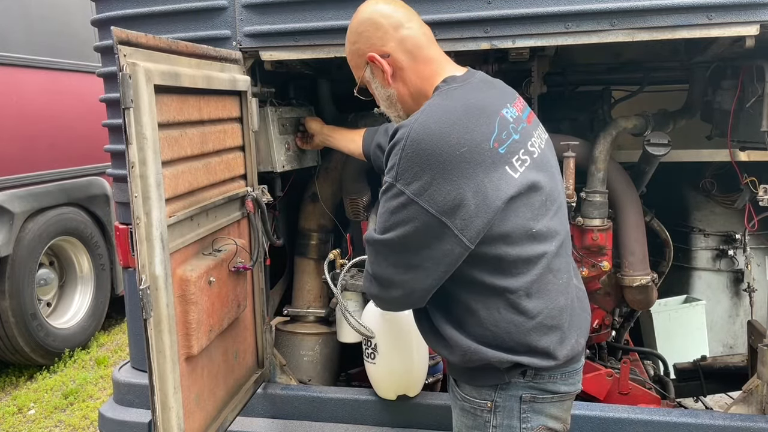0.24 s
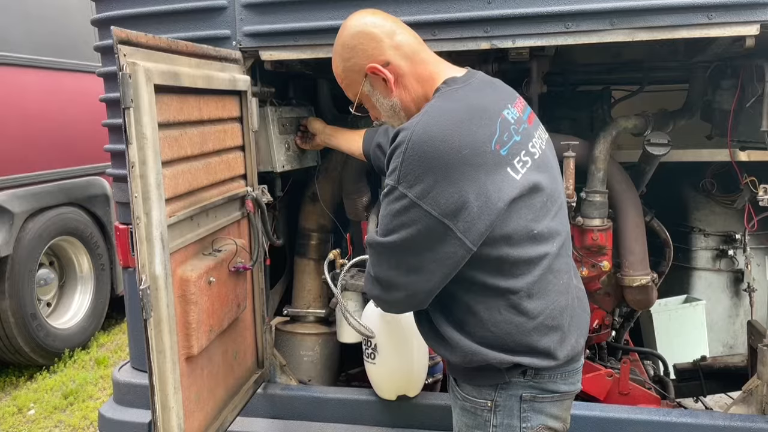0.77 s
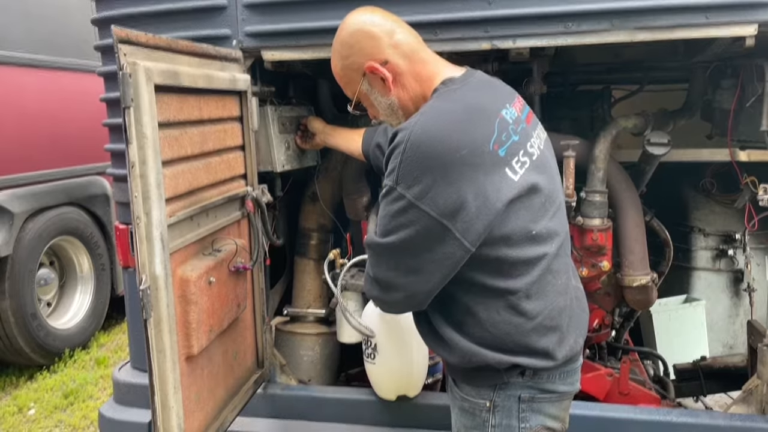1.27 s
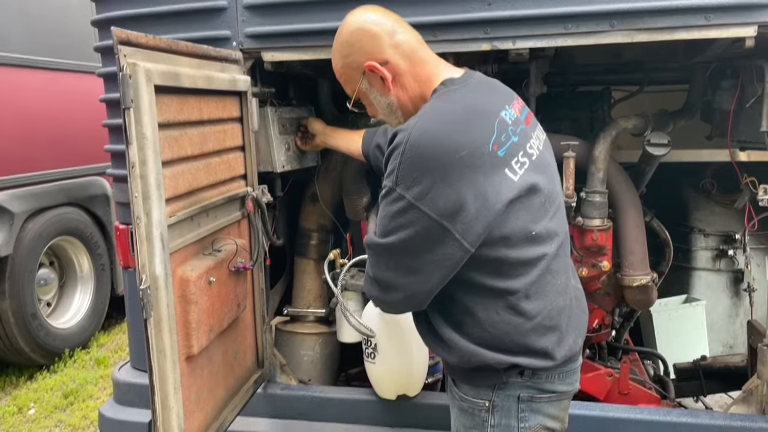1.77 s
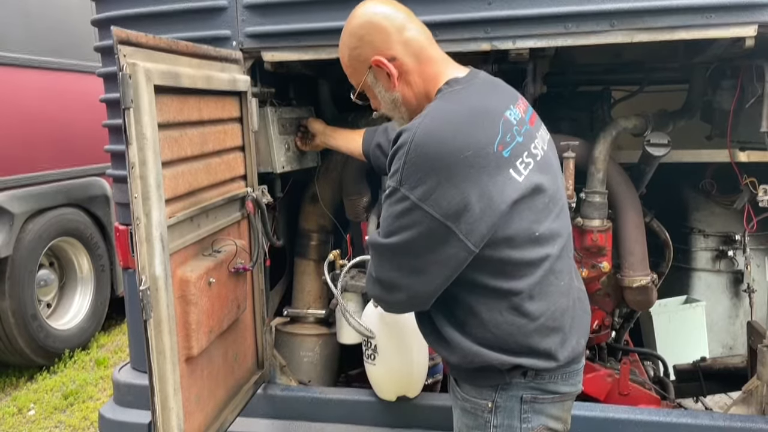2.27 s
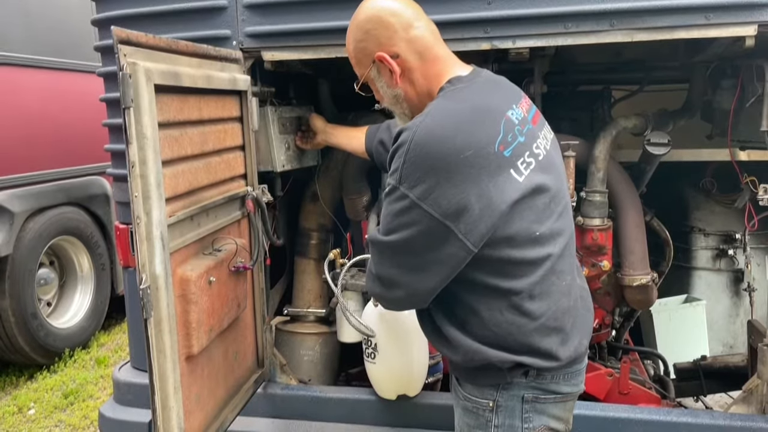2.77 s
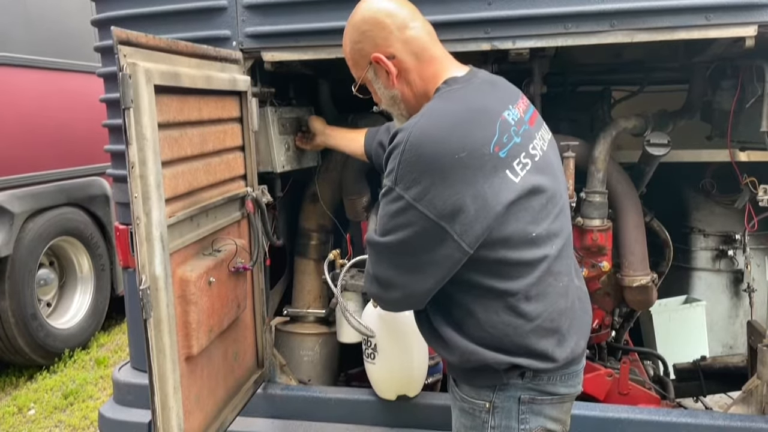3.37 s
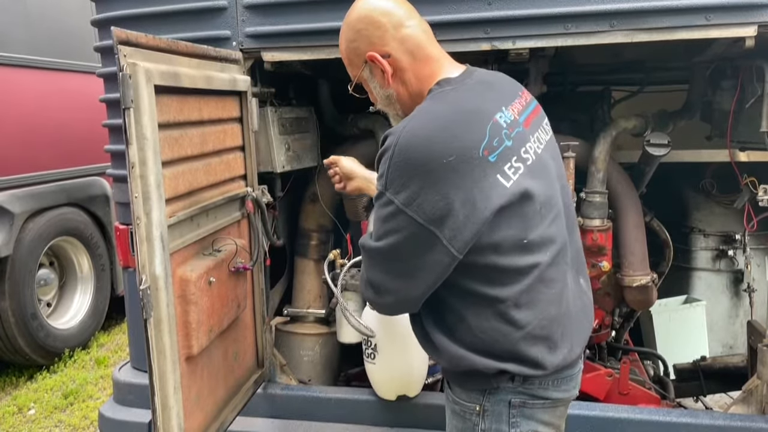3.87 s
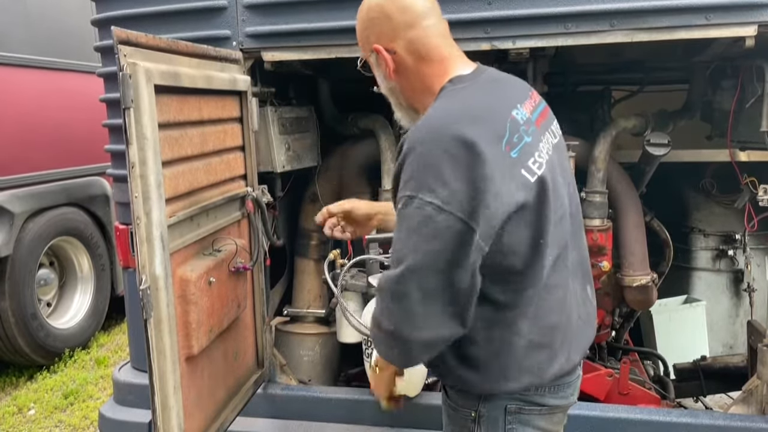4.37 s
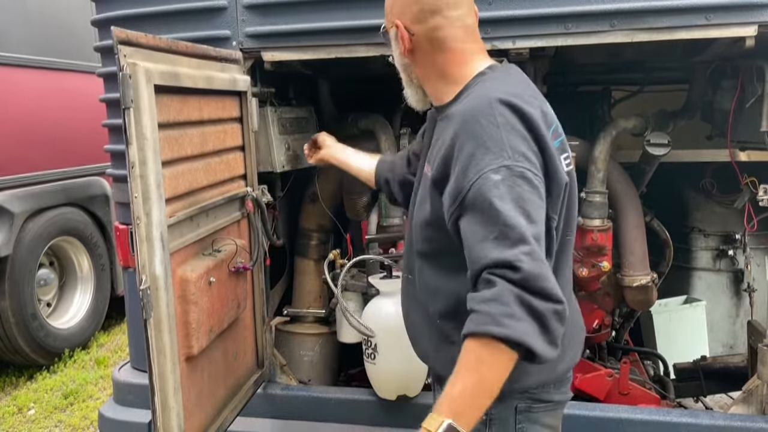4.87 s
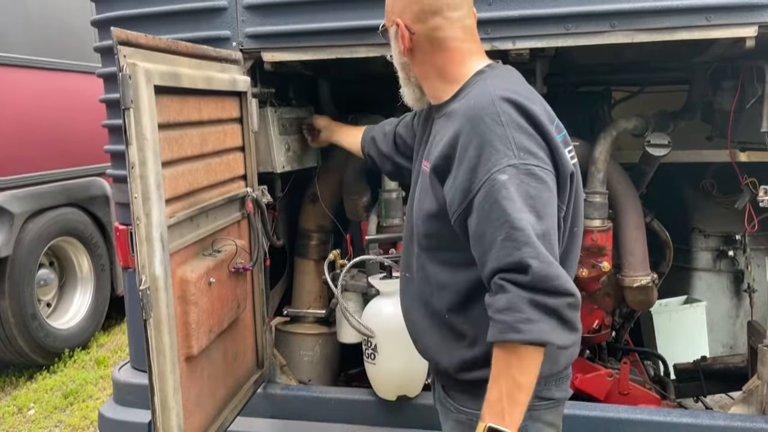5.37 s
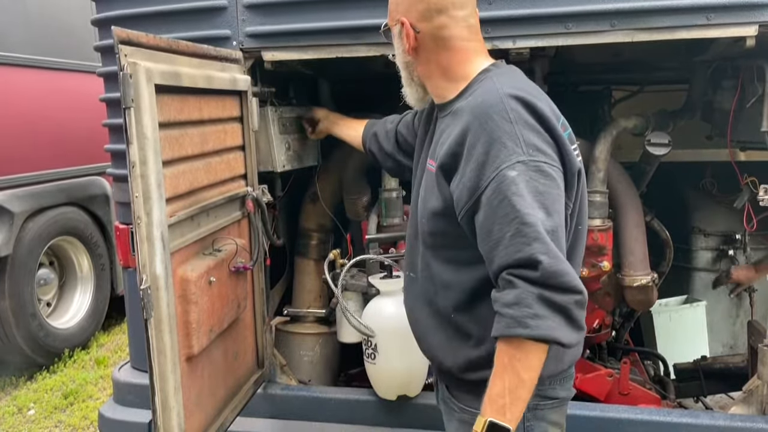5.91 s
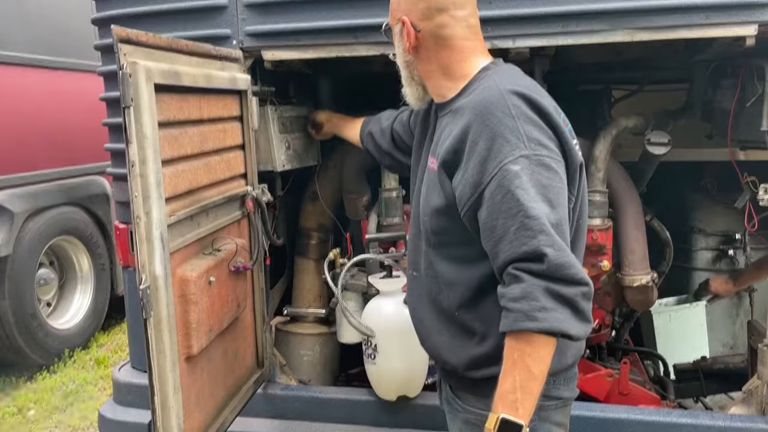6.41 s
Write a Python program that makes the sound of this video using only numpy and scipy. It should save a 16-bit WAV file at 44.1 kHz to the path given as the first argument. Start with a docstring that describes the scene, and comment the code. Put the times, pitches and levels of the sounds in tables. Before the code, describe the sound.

Outdoors, microphones close to an open engine bay, nearly dry. For the first 0.36 s there is only faint yard noise. An air valve then leaks and spits with a bright, pipe-like whistle, fading soon after 0.5 s; at 0.4 s the starter jolts and groans, its pitch sagging then climbing. From 0.63 to 1.05 s uneven single firings thump the exhaust pipe. At about 1.06 s the large two-stroke diesel catches with a sharp crack, full bass drone and hard clatter, peaks in speed near 1.4 s and eases down by 2 s. The starter gear grinds, whines and squeals around 2.2 kHz until 2.5 s. A steady throbbing idle remains until 6.6 s: low exhaust drone near 75 Hz, block knocks, sizzling injector ticks. Dull panel thuds fall between 2.9 and 5.7 s, strongest near 4.0; sheet-metal buzz swells and small metallic chirps come around 3.6 and 4.4-5.3 s.

```python
"""A two-stroke V6 bus diesel starts in its open rear bay, outdoors: an air valve leaks, spits and whistles
by pipe resonance, and the starter jolts and groans. Single firings ring the exhaust pipe, then the engine
catches, overshoots and settles to a slow idle while the starter gear grinds on until 2.5 s. Exhaust orders,
block knocks and injector ticks all follow one crank angle; at idle, struck panels thud, and loose metal
buzzes and chirps."""
import sys
import numpy as np
from scipy import signal
from scipy.fft import rfft, irfft, next_fast_len
from scipy.io import wavfile
from scipy.ndimage import uniform_filter1d, map_coordinates

SR = 44100
rng = np.random.default_rng(int(sys.argv[2]) if len(sys.argv) > 2 else 0)


def unload_wav(signal):
    """Save mono or channel-first audio to the path in sys.argv[1] as 16-bit WAV at rate SR, clipped to [-1, 1]."""
    wavfile.write(
        sys.argv[1],
        SR,
        np.round(np.clip(np.atleast_2d(signal).T, -1, 1) * 32767).astype(np.int16),
    )


N = 293072

# the crank starts to turn, air reaches the exhaust, all cylinders fire, they knock at full strength (s)
CRANK_S, PUMPING_S, CAUGHT_S, KNOCKING_S = 0.401, 0.475, 1.056, 1.085
CLATTER_RISE_DB_PER_S = 19.5  # growth of clatter and resting buzz until the engine has caught


def amp(db):
    """Logarithmic level: decibels to amplitude gain."""
    return 10 ** (np.asarray(db) / 20)


def unit(x):
    """Power normalization: scale to rms 1."""
    return x / np.sqrt(np.mean(x ** 2) + 1e-20)


def clock():
    """Uniform sampling: the time of each sample in seconds."""
    return np.arange(N) / SR


def along(points, hz):
    """Logarithmic frequency scale: interpolate (Hz, value) points."""
    f, value = np.transpose(points)
    return np.interp(np.log(hz + 1), np.log(f + 1), value)


def curves(rows):
    """Linear interpolation in time: one curve for each column after the time."""
    s, *columns = np.transpose(rows)
    return [np.interp(clock(), s, column) for column in columns]


def wobble(rate):
    """Band-limited fluctuation: a smooth random curve with rate knots a second."""
    knots = rng.standard_normal(int(N * rate / SR) + 4)
    return map_coordinates(knots, [np.arange(N) * rate / SR])


def rise(full_s, db_per_s):
    """Exponential growth: dB of a level that climbs steadily to 0 and stays there."""
    return db_per_s * np.minimum(clock() - full_s, 0)


def fall(from_s, db_per_s):
    """Exponential decay: dB of a level that stays at 0 and then sinks steadily."""
    return -db_per_s * np.maximum(clock() - from_s, 0)


def swell(s, width_s):
    """Gaussian envelope around time s, with 1/e half-length width_s."""
    return np.exp(-((clock() - s) / width_s) ** 2)


def strike(s, t60, attack):
    """Impact response: a brief build-up at time s, then exponential decay."""
    t = np.maximum(clock() - s, 0)
    return amp(-60 * t / t60) * (1 - np.exp(-t / attack))


def filtered(x, response):
    """Linear filtering: multiply the spectrum by a complex response of frequency."""
    m = next_fast_len(N + SR // 2)
    return irfft(rfft(x, m) * response(np.fft.rfftfreq(m, 1 / SR)), m)[..., :N]


def coloured(x, spectrum):
    """Spectral shaping: x through a gain curve, at rms 1."""
    return unit(filtered(x, lambda hz: amp(along(spectrum, hz))))


def noise():
    """Incoherent sources: two unrelated white noises."""
    return rng.standard_normal((2, N))


def resonant(x, modes):
    """Modal superposition: x through (Hz, width Hz, dB) resonances of alternating sign, at rms 1."""
    def body(f):
        response = 0
        for k, (centre, width, db) in enumerate(modes):
            damping = 1j * f * width
            response = response + (-1) ** k * amp(db) * damping / (centre ** 2 - f ** 2 + damping)
        return response
    return unit(filtered(x, body))


def rippled(x, depth_db, step_hz=45):
    """Modal density: many fixed modes of a casting ripple the spectrum within bounds."""
    knots = rng.standard_normal(SR // 20)

    def ripple(hz):
        return amp(depth_db * np.tanh(map_coordinates(knots, [hz / step_hz])))
    return unit(filtered(x, ripple))


def rung(events, modes, attack):
    """Impulsive excitation: each (s, dB) blow rings (Hz, dB, t60) modes at slightly new strengths."""
    out = np.zeros(N)
    for s, db in events:
        t = clock() - s
        for hz, level, t60 in modes:
            strength = amp(db + level + rng.normal(0, 1))
            out -= strength * np.sin(2 * np.pi * hz * t) * strike(s, t60, attack)
    return out


def blows(turn, table, scatter_db, jitter):
    """Angular synchronism: an impulse near each passage of the crank through a table angle."""
    angle, db = np.transpose(table)
    at = (np.arange(int(turn[-1]) + 1)[:, None] + angle).ravel()
    chance = rng.standard_normal((len(at), 2))
    where = np.interp(at, turn, np.arange(N)) + jitter * SR * chance[:, 0]  # jitter in s
    size = amp(np.resize(db, len(at)) + scatter_db * chance[:, 1]) * (at < turn[-1])
    return np.bincount(np.clip(where, 0, N - 1).astype(int), size, N)


def dying(hits, t60, attack=0.00094):
    """Energy decay: the energy of each impulse builds up briefly and fades; envelope of rms 1."""
    energy = signal.lfilter([1], [1, -amp(-120 / (t60 * SR))], hits ** 2)
    return unit(np.sqrt(signal.lfilter([1], [1, -np.exp(-1 / (attack * SR))], energy)))


def wavering(hz, waver, flutter_db):
    """Frequency and amplitude modulation: an unsteady tone of rms about 1, in quadrature."""
    phase = 2 * np.pi * np.cumsum(hz * (1 + waver * wobble(90))) / SR
    return amp(flutter_db * wobble(59.9)) * np.sqrt(2) * np.array([np.sin(phase), np.cos(phase)])


def squeaks(rows, waver=.012, flutter_db=2):
    """Metal slipping on metal: each (s, half-length, Hz, dB) row is a short, unsteady tone."""
    uneven = np.cumsum(1 + waver * wobble(220)) / SR
    out = np.zeros(N, complex)
    for s, width, hz, db in rows:
        near = np.abs(clock() - s) < 2 * width
        out[near] += amp(db) * swell(s, width)[near] * np.exp(2j * np.pi * hz * uneven[near])
    return amp(flutter_db * wobble(150)) * np.sqrt(2) * np.array([out.real, out.imag])


def patchy(x, depth_db, size):
    """Time-frequency modulation: patches of size (bands, frames) flare and fade on their own."""
    z = signal.stft(x, nperseg=512)[2]
    field = rng.standard_normal(z.shape[1:])
    for axis in (0, 1):
        field = uniform_filter1d(field, size[axis], axis=axis)
    return signal.istft(z * amp(depth_db * unit(field)), nperseg=512)[1][:, :N]


# likeness of the two closely spaced ports: f/Hz, coherence
COHERENCE = [(100, .99), (200, .96), (380, .82), (700, .7), (1400, .6), (3000, .72), (5500, .68),
             (7000, .8), (8500, .97), (10000, .88), (13000, .87)]
# phase by which left leads: f/Hz, phase/rad
PHASE_LEAD = [(100, 0), (860, -.1), (1460, -.8), (3100, 1.1), (5000, .8), (5800, -.6), (6900, -1.4),
              (7900, -2.9), (9200, -3.3), (9900, -3.9), (11400, -4.9), (12600, -6.1)]
# level of left above right: f/Hz, level/dB
LEVEL_DIFFERENCE = [(60, 4), (110, -0.5), (200, 1), (380, 1.5), (700, 1.5), (1290, -1), (2380, 2.0),
                    (4400, 4.5), (8120, 1), (15000, 0)]


def ports(pair):
    """Partial coherence: two unrelated signals become left and right of closely spaced microphones."""
    def mix(hz):
        angle = np.arccos(np.clip(along(COHERENCE, hz), -1, 1)) / 2
        return np.array([np.cos(angle), np.sin(angle)])

    def tilt(hz):
        half = amp(along(LEVEL_DIFFERENCE, hz) / 2) * np.exp(.5j * along(PHASE_LEAD, hz))
        return np.array([half, 1 / half])
    mid, side = filtered(pair, mix)
    return filtered(np.array([mid + side, mid - side]), tilt)


# relative spectrum of the yard noise: f/Hz, level/dB
YARD_SPECTRUM = [(20, -42), (38, -28), (74, 1), (130, -7), (326, -15.5), (892, -17), (2080, -17.5),
                 (3350, -32.5), (10000, -38.5), (14000, -40)]


def yard():
    """Stationary ambient noise: a faint, broad outdoor background."""
    return amp(-46.5) * coloured(noise(), YARD_SPECTRUM)


# dull bumps in the bay, levels relative: t/s, level/dB
BAY_BUMPS = [(2.886, -14), (2.94, -13), (2.992, -10), (3.352, -14), (3.991, -6), (4.33, -12.5),
             (5.052, -10.5), (5.712, -9)]
# modes of the struck panel: f/Hz, level/dB, t60/s
PANEL_MODES = [(226, -3, .09), (259, -4, .08), (302, -1, .07), (359, -2, .06), (426, -2, .045),
               (508, -2, .035)]
# relative spectrum of the contact thud: f/Hz, level/dB
THUD_SPECTRUM = [(120, -25), (200, 5), (520, -1), (750, -16), (1500, -47)]


def bumps(bump_db=-6, thud_db=-5, thud_t60=.09):
    """Impact excitation: something heavy thuds dully against a bay panel, whose modes ring briefly."""
    contacts = sum(amp(db) * strike(s, thud_t60, 0.0026) for s, db in BAY_BUMPS)
    ringing = amp(bump_db) * rung(BAY_BUMPS, PANEL_MODES, attack=0.0029)
    return ringing + amp(thud_db) * ports(contacts * coloured(noise(), THUD_SPECTRUM))


# chirps of loose metal at idle: t/s, 1/e half-length/s, f/Hz, level/dB
METAL_CHIRPS = [(3.52, .015, 3080, -38), (3.61, .014, 3065, -42), (3.73, .016, 3110, -40),
                (4.383, .012, 4000, -43), (4.872, .012, 2930, -39), (5.033, .012, 3080, -37),
                (5.056, .009, 4392, -34), (5.112, .013, 3370, -37), (5.176, .007, 4048, -34),
                (5.252, .011, 3130, -39), (5.3, .015, 3060, -40)]


def chirps():
    """Frictional slip: loose metal gives short, unsteady tones at idle."""
    return squeaks(METAL_CHIRPS)


# sheet-metal resonances: f/Hz, half the bandwidth of each of two cascaded resonators/Hz, level/dB
SHEET_MODES = [(920, 45, -1.5), (1030, 70, 0), (1250, 90, -7), (1400, 55, 2), (1610, 100, -7),
               (1810, 89, -2.5), (3120, 150, -7.5), (3640, 120, -10.5), (4080, 260, -14)]
# buzzing spells: middle t/s, 1/e half-length/s, level/dB
BUZZ_SPELLS = [(3.1, 0.14, -35), (3.66, 0.26, -28), (4.95, .13, -29.5), (5.256, 0.099, -30),
               (5.652, 0.16, -30), (6.35, 0.26, -29.5)]
BUZZ_REST_DB = -40.5  # between the spells


def buzz(patchy_db=2.2):
    """Resonant rattle: loose sheet parts buzz in spells, each fluctuating on its own."""
    parts = 0
    for hz, half_width, db in SHEET_MODES:
        mode = [(hz, 2 * half_width, 0)]
        band = resonant(resonant(noise(), mode), mode)
        parts = parts + amp(db + patchy_db * wobble(16)) * np.sqrt(half_width) * band
    rest = amp(BUZZ_REST_DB + rise(CAUGHT_S, CLATTER_RISE_DB_PER_S))
    spells = sum(amp(db) * swell(s, width) for s, width, db in BUZZ_SPELLS)
    return np.hypot(rest, spells) * unit(parts)


# resonances of the valve and its pipe: f/Hz, width/Hz, level/dB
VALVE_MODES = [(3110, 110, -1), (3550, 99, 0), (3740, 75, 4.5), (4400, 260, -4), (4820, 80, -4),
               (5680, 60, -7), (6330, 63, -3), (6520, 90, -4), (7000, 93, -2), (7220, 90, 2), (7750, 90, 2),
               (8750, 120, -7), (9850, 83, 7), (10700, 60, 2), (11500, 60, -4)]
# relative spectrum of the hiss: f/Hz, level/dB
HISS_SPECTRUM = [(150, -16), (500, -13), (2500, -8), (3200, -4), (4600, -11), (5000, -11), (5600, -4),
                 (6500, 0), (9000, 1.5), (11800, 4.5), (13500, -15), (15500, -23)]
# the pipe's firmest partials, ringing as tones: f/Hz, level/dB
PIPE_WHISTLES = [(3130, -6), (3710, 0), (4370, -4), (4790, -7), (5710, -8), (6330, -4), (7180, -5)]
UNSEAT_S, OPEN_S, EMPTY_S = .364, .383, 0.47  # unseats, opens, supply runs out
FLOW_DB, FLOW_FALL_DB_PER_S = -21, 160  # flow before sputter, fall once the supply is out


def air_valve(pipe_db=-3.5, hiss_db=-2.5, spit_db=-14, spit_t60=0.12, leak_db=-35, leak_t60=0.079):
    """Jet noise and pipe resonance: air leaks, spits and whistles, fading as the pressure drops."""
    air = amp(pipe_db) * resonant(noise(), VALVE_MODES) + amp(hiss_db) * coloured(noise(), HISS_SPECTRUM)
    tones = sum(amp(db) * wavering(hz, waver=.005, flutter_db=3) for hz, db in PIPE_WHISTLES)
    whistle = amp(-10) * unit(tones)
    flow = amp(FLOW_DB + fall(EMPTY_S, FLOW_FALL_DB_PER_S)) * (clock() > OPEN_S)
    spit = amp(spit_db) * strike(OPEN_S, spit_t60, 0.0035)
    leak = amp(leak_db) * strike(UNSEAT_S, leak_t60, 0.0011)
    sputter = amp(1.5 * wobble(250))
    return (leak + spit + flow * sputter) * (air + whistle)


# starter housing resonances: f/Hz, width/Hz, level/dB
HOUSING_MODES = [(1814, 50, -4), (2170, 80, -5), (2256, 55, -2), (2406, 60, -4), (2622, 45, -9),
                 (2783, 60, -7), (2950, 50, -7.5), (3106, 55, -10), (6160, 98, -18), (6850, 170, -19)]
# relative spectrum of the gear whir: f/Hz, level/dB
WHIR_SPECTRUM = [(500, -13), (1500, 0.5), (2400, 0), (3500, -4), (5500, -12.5), (6300, -9.5), (11500, -6.5),
                 (13500, -26), (15500, -49)]
# the motor sags under its load, then picks up: t/s, f/Hz, level/dB
MOTOR_GROAN = [(.41, 245.3, -45), (.43, 198.6, -30), (.455, 151, -32), (.5, 172, -30.5), (.53, 205, -39),
               (.57, 222, -34), (.61, 225, -44), (.695, 233, -28.5), (.73, 294, -34), (.78, 326.5, -36),
               (.86, 379, -44)]
# squeals of the starter gear: t/s, 1/e half-length/s, f/Hz, level/dB
GEAR_SQUEALS = [(.81, .018, 2250, -29), (.845, .014, 2411, -30), (.89, .014, 1810, -32),
                (1.141, 0.013, 1378, -26), (1.578, .016, 2260, -27.5), (1.71, 0.016, 3100, -31),
                (1.72, .02, 2280, -29), (1.77, .026, 2255, -26), (1.953, .015, 2799, -32),
                (2.035, .016, 2220, -29), (2.186, 0.016, 2928, -33), (2.24, .016, 2239, -25),
                (2.425, .026, 2215, -27)]
WHINE_HZ, WHINE_DB = 2245, -13  # mean pitch; level relative to the grind
# the gear comes up to full grind, holds, and is let go
GRIND_FULL_S, GRIND_OFF_S, GRIND_DB = 0.8, 2.505, -27.5
GRIND_RISE_DB_PER_S, GRIND_FALL_DB_PER_S = 77, 172


def starter(turn, ring_db=-3.7, whir_db=-3.2, surge_db=1.0, jolt_db=-27.5):
    """Gear-mesh excitation of a housing: the motor jolts and groans; its gear rasps, whines and squeals."""
    jolt_spectrum = [(120, -30), (200, -6), (290, 3), (400, -4.0), (800, -3), (2000, -28)]
    jolt = coloured(noise(), jolt_spectrum) * strike(CRANK_S, 0.51, 0.0049)
    ring = amp(ring_db) * resonant(noise(), HOUSING_MODES)
    whir = amp(whir_db) * coloured(noise(), WHIR_SPECTRUM)
    whine = amp(WHINE_DB) * wavering(WHINE_HZ, waver=.022, flutter_db=4)
    rasp = patchy(ring + whir + whine, depth_db=2.5, size=(5, 6))
    chatter_db = 1.6 * wobble(140) + wobble(25)
    load = np.cos(2 * np.pi * 3 * (turn - .41))  # three surges per crank turn
    engaged_db = GRIND_DB + rise(GRIND_FULL_S, GRIND_RISE_DB_PER_S) + fall(GRIND_OFF_S, GRIND_FALL_DB_PER_S)
    grind = amp(engaged_db + surge_db * load + chatter_db) * rasp
    groan_hz, groan_db = curves(MOTOR_GROAN)
    groan = amp(groan_db) * (clock() < CAUGHT_S) * wavering(groan_hz, waver=.17, flutter_db=4)
    return amp(jolt_db) * jolt + grind + groan + squeaks(GEAR_SQUEALS)


# the first ragged firings, thump level relative: t/s, thump level/dB, knock level/dB
RAGGED_FIRINGS = [(.632, -21, -27), (.685, -12.5, -28), (.716, -17, -26.5), (.808, -7.5, -26.5),
                  (.866, -3, -30), (.889, -20, -21), (.912, -8, -35), (.972, -2.5, -20.5), (1.046, -3, -40)]
# modes of the exhaust pipe: f/Hz, level/dB, t60/s
PIPE_MODES = [(61.8, 0, 0.26), (85.5, -1, 0.11), (143, -7, 0.086)]
# relative spectrum of a firing's puff: f/Hz, level/dB
PUFF_SPECTRUM = [(20, -18), (40, -12), (62, 2), (95, -1), (150, -3.5), (230, -15), (330, -26), (600, -58)]
# relative spectrum of the engine block, also used by the clatter: f/Hz, level/dB
BLOCK_SPECTRUM = [(170, -35), (230, 5), (330, -5.5), (410, -2), (530, -0.5), (590, -2.5), (650, 4.5),
                  (835, 1.5), (885, -2.5), (1020, -3), (1200, -7), (1420, -6.5), (1800, -10), (2150, -16.5),
                  (3200, -17), (5500, -47)]


def first_firings(thump_db=-2, knock_t60=0.26, puff_db=-10, puff_t60=.27):
    """Transient pipe resonance: single firings thump the exhaust pipe, puff out and knock in the block."""
    thumps = rung([(s, db) for s, db, _ in RAGGED_FIRINGS], PIPE_MODES, attack=0.0045)
    puffs = sum(amp(db) * strike(s, puff_t60, .006) for s, db, _ in RAGGED_FIRINGS)
    knocks = sum(amp(db) * strike(s, knock_t60, 0.0018) for s, _, db in RAGGED_FIRINGS)
    puffing = amp(puff_db) * puffs * coloured(noise(), PUFF_SPECTRUM)
    return amp(thump_db) * thumps + ports(puffing + knocks * coloured(noise(), BLOCK_SPECTRUM))


# starting fuel makes ticks and knocks louder; FUEL_FADE_S is its 1/e time
FUEL_TICK_DB, FUEL_KNOCK_DB, FUEL_FADE_S = 4.5, 1.5, 0.76


def starting_fuel():
    """Governor control: extra fuel is full until the engine has caught, then is taken back."""
    return np.exp(-(np.maximum(clock() - CAUGHT_S, 0) / FUEL_FADE_S) ** 2)


# the injectors that stand out: crank angle/turn, level/dB
INJECTOR_TICKS = [(.06, -5.5), (.249, 2.7), (.393, -.7), (.697, -1.3), (.912, -5.5)]
# rockers and valves snapping shut: crank angle/turn, level/dB
TAPPET_CLICKS = [(.075, -4), (.258, 0), (.275, 2), (.32, -.5), (.415, 1.5), (.46, 0), (.565, -7),
                 (.738, 1.5), (.79, -4), (.955, -5)]
# sharp cracks of hard combustion: t/s, level/dB
COMBUSTION_CRACKS = [(1.078, -17), (1.154, -27), (1.26, -27), (1.688, -27), (2.227, -28)]
# relative spectrum of the ticking steel: f/Hz, level/dB
TICK_SPECTRUM = [(1200, -16), (2500, 6.5), (3200, 4.5), (4000, 4.5), (5000, 2.5), (5600, -1), (8000, -3),
                 (9500, 2), (11500, 3), (12500, -7), (14000, -21), (15500, -44)]
TICK_DB, TICK_RISE_DB_PER_S = -32.5, 42  # idle level, growth until the engine has caught


def injectors(turn, tick_t60=0.11, sizzle_t60=0.26, tick_db=-9, sizzle_db=-1.3, crack_t60=0.045):
    """Periodic impact noise: each injector ticks and sizzles amid tappet clicks; more fuel, harder ticks."""
    hits = blows(turn, INJECTOR_TICKS, scatter_db=1.2, jitter=.0008)
    ticks = amp(tick_db) * dying(hits, tick_t60)
    sizzle = amp(sizzle_db) * dying(hits, sizzle_t60, attack=0.0082)
    snaps = blows(turn, TAPPET_CLICKS, scatter_db=2, jitter=.0013)
    clicks = amp(-9) * dying(snaps, .033, attack=.0005)
    envelope = np.sqrt(ticks ** 2 + sizzle ** 2 + clicks ** 2)  # energies add
    cracks = sum(amp(db) * strike(s, crack_t60, 0.00046) for s, db in COMBUSTION_CRACKS)
    grain = amp(1.5 * wobble(600))
    steel = rippled(coloured(grain * noise(), TICK_SPECTRUM), depth_db=4.0)
    level_db = TICK_DB + FUEL_TICK_DB * starting_fuel() + rise(CAUGHT_S, TICK_RISE_DB_PER_S)
    return (amp(level_db) * envelope + cracks) * steel


# combustion and gear knocks in the block: crank angle/turn, level/dB
BLOCK_KNOCKS = [(.05, 3.5), (.09, 4.5), (.127, 3.5), (.17, -2), (.21, -3.5), (.258, 2), (.31, -2),
                (.347, 1.5), (.382, .5), (.447, 1), (.483, -3), (.546, -1.5), (.597, -3.5), (.645, -1.5),
                (.685, .5), (.725, 0), (.757, .5), (.805, .5), (.84, -3), (.88, 2.5), (.92, 2), (.988, 1.5)]
# hum of the gear train: f/crank speed, level/dB
GEAR_ORDERS = [(82, -6), (102, 1), (108, -2), (130, -3)]


def clatter(turn, level_db, ring_t60=0.055, rattle_t60=0.048, gears_db=-16):
    """Convolution with a modal response: knocks ring the block and bay, loose parts shake, gears hum."""
    hits = blows(turn, BLOCK_KNOCKS, scatter_db=.7, jitter=.00006)
    t = np.arange(SR // 6) / SR
    burst = rng.standard_normal((2, len(t))) * amp(-60 * t / ring_t60) * (1 - np.exp(-t / 0.003))
    modes = rfft(burst)
    answer = irfft(modes / np.sqrt(uniform_filter1d(np.abs(modes) ** 2, size=12)))  # evenly strong modes
    ring = coloured(signal.fftconvolve(hits[None], answer, axes=1)[:, :N], BLOCK_SPECTRUM)
    roar = .4  # steady gear-train noise between the knocks, relative to the rattle envelope
    rattle = coloured(noise() * np.hypot(dying(hits, rattle_t60), roar), BLOCK_SPECTRUM)
    hum = sum(amp(db + wobble(8)) * np.exp(2j * np.pi * order * turn) for order, db in GEAR_ORDERS)
    knocking = amp(-1.3) * ring + amp(-3.2) * rattle
    return amp(level_db) * (knocking + amp(gears_db) * unit(np.array([hum.real, hum.imag])))


# relative spectrum of exhaust turbulence, in wash and exhaust: f/Hz, level/dB
RUMBLE_SPECTRUM = [(20, -13), (40, -15), (60, 2), (90, -7.5), (150, -3), (240, -7), (330, -17.5),
                   (600, -69)]


def exhaust_wash(exhaust_db):
    """Incoherent scattering: exhaust off the ground and bodywork arrives unlike in each port."""
    return amp(exhaust_db - 19.5) * coloured(noise(), RUMBLE_SPECTRUM)


# the exhaust note: f/crank speed, level/dB
EXHAUST_ORDERS = [(7, -37), (8, -33), (9, -21), (10, -28.5), (11, -23), (12, -10.5), (13, -33), (14, -27),
                  (15, -19), (16, -26), (17, -35), (18, -26.5), (19, -35), (20, -32), (21, -21), (22, -34),
                  (23, -19.8), (24, -24), (25, -40), (27, -37.5), (29, -38.5), (30, -30.5), (31, -29.5),
                  (43, -34.5), (44, -38)]


def exhaust(turn, level_db, unsteady_db=0.5, rumble_db=-17.5, catching_db=8):
    """Harmonic synthesis by crank order, over turbulence that is stronger while firing is ragged."""
    lag, spread = .795, .14825  # crank turns; crank turns per order
    note = np.zeros(N)
    for order, db in EXHAUST_ORDERS:
        delay = lag + spread * order  # the silencer holds back the higher orders
        note -= amp(db + unsteady_db * wobble(7.6)) * np.cos(2 * np.pi * order * (turn - delay))
    ragged = np.interp(clock(), [.9, 1.3], [1, 0])
    rumble = amp(rumble_db + catching_db * ragged) * ports(coloured(noise(), RUMBLE_SPECTRUM))
    return amp(level_db) * (amp(-0.22 - 2 * ragged) * unit(note) + rumble)


# crankshaft speed: t/s, turns per second
CRANK_SPEED = [(0.4, 3.35), (0.7, 3.991), (1.1, 5.744), (1.35, 6.828), (1.45, 6.811), (1.95, 6.237),
               (2.3, 6.217), (2.6, 6.283), (2.9, 6.076), (3.6, 6.255), (6.1, 6.383), (6.65, 6.372)]
# idle levels, exhaust growth until caught, and weakening while cylinders still miss
EXHAUST_DB, EXHAUST_RISE_DB_PER_S, CLATTER_DB = -9.5, 41, -23
MISS_EXHAUST_DB, MISS_CLATTER_DB = 5.5, 4


def scene():
    """Common crank phase: engine sources share one angle and grow until all cylinders fire."""
    turn = np.cumsum(curves(CRANK_SPEED)[0]) / SR

    def missing(until_s):
        return np.clip((until_s - clock()) / 0.011, 0, 1)
    exhaust_db = EXHAUST_DB + rise(CAUGHT_S, EXHAUST_RISE_DB_PER_S) - MISS_EXHAUST_DB * missing(CAUGHT_S)
    clatter_db = CLATTER_DB + FUEL_KNOCK_DB * starting_fuel() + rise(CAUGHT_S, CLATTER_RISE_DB_PER_S)
    clatter_db = clatter_db - MISS_CLATTER_DB * missing(KNOCKING_S)
    running = np.clip((clock() - CRANK_S) / 0.015, 0, 1)
    pumping = np.clip((clock() - PUMPING_S) / 0.03, 0, 1)
    metal = chirps() + buzz() + starter(turn) + injectors(turn) + clatter(turn, clatter_db)
    breath = pumping * (exhaust_wash(exhaust_db) + exhaust(turn, exhaust_db))
    bass = bumps() + first_firings() + breath
    return bass + ports(yard() + air_valve() + running * metal)


TOP_HZ = 15700  # band limit


def record(dry, top=0.99):
    """Soft saturation and band limiting: peaks are rounded off, then the top band is removed."""
    soft = dry / (1 + np.abs(dry / top) ** 8) ** (1 / 8)
    return filtered(soft, lambda hz: hz < TOP_HZ)


dry = scene()
out = record(dry)
unload_wav(out)
```